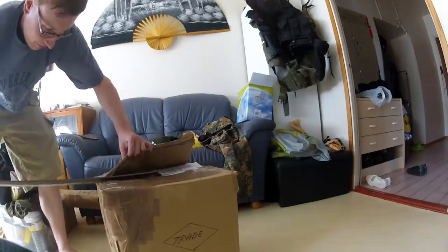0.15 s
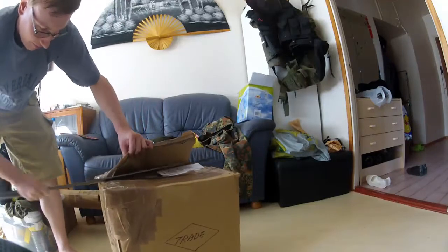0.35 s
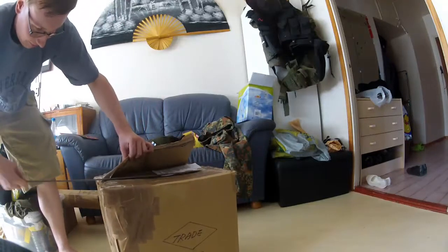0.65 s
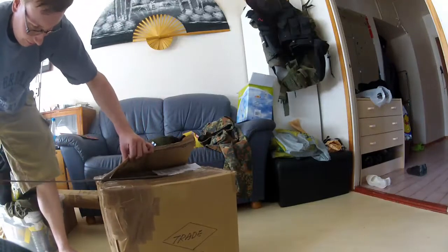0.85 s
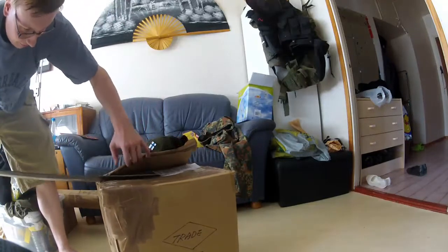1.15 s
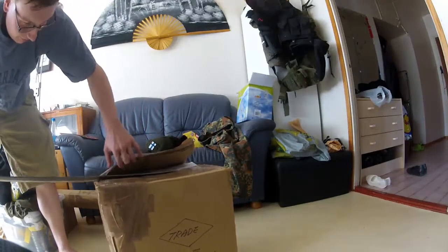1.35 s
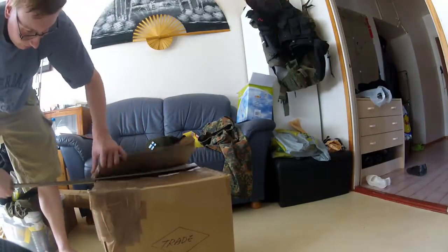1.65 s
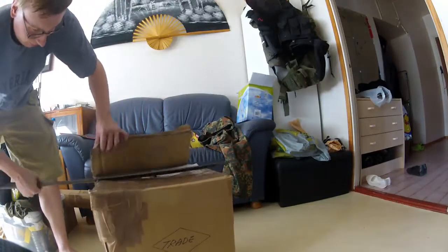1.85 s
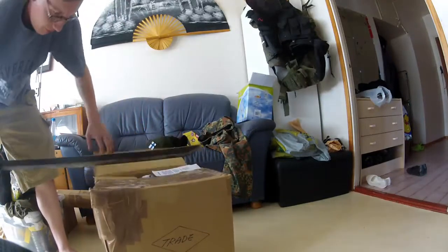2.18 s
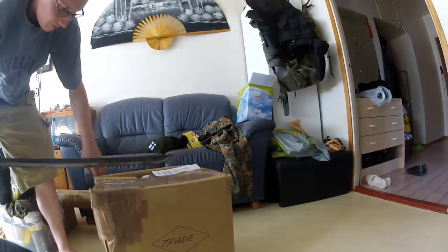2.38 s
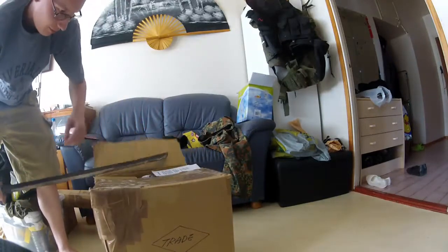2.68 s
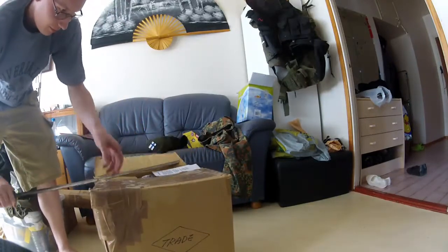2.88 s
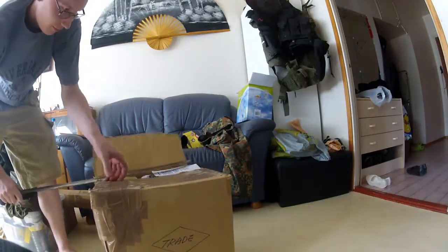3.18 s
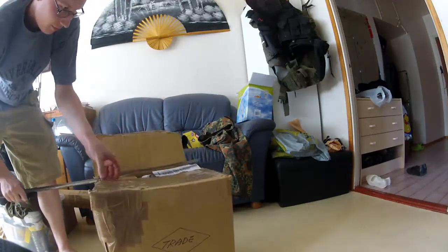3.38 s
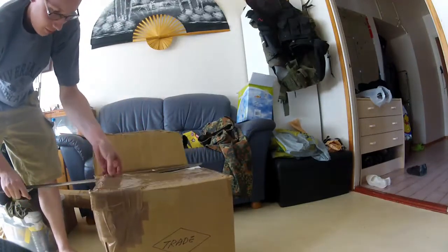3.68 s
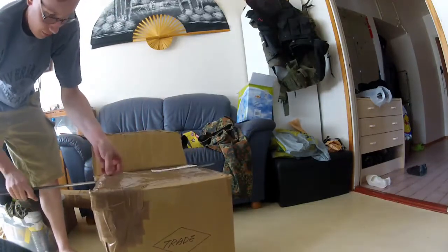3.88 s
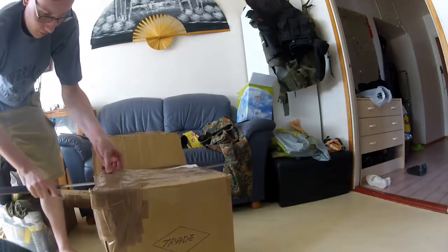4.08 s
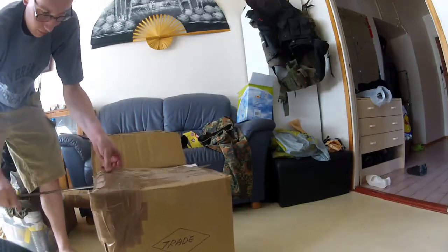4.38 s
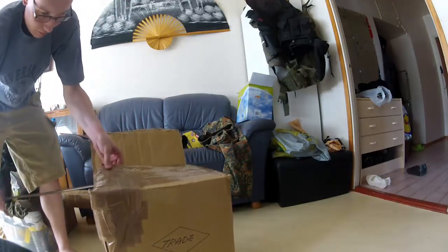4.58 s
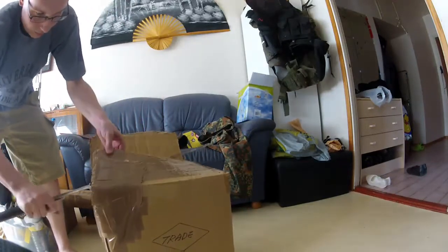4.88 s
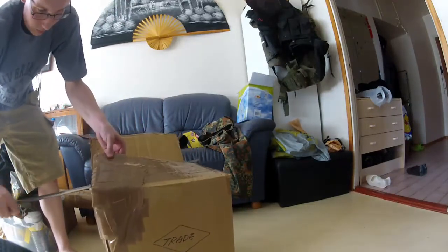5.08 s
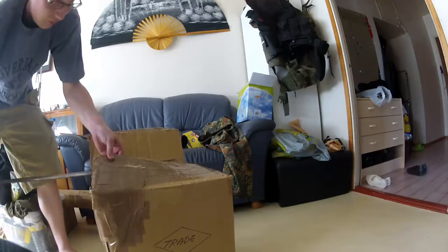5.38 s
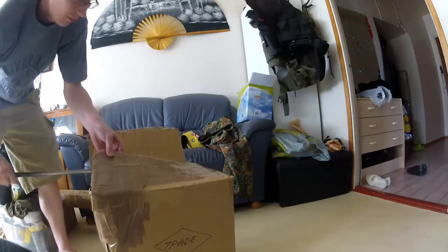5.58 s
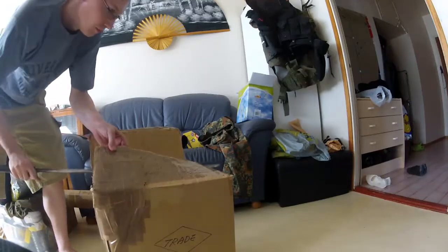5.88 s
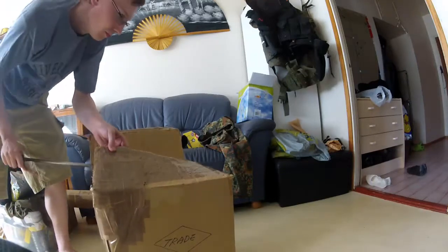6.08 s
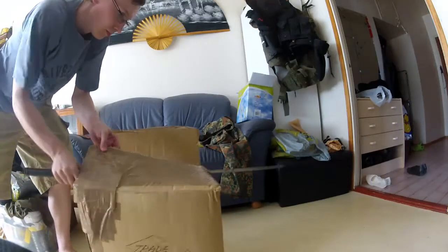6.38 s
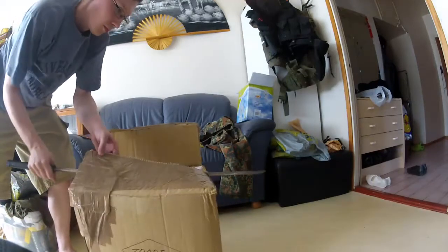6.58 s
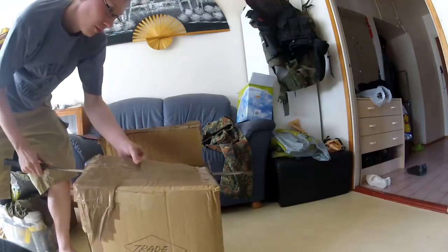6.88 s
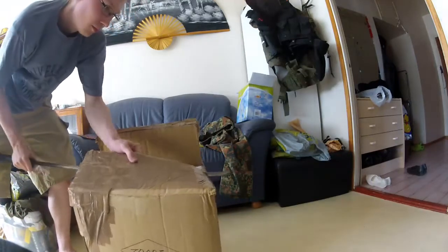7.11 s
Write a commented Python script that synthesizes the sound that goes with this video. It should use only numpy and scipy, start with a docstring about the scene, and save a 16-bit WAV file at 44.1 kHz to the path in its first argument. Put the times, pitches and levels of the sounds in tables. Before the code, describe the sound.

A small, lightly reverberant living room, heard from a metre or two through a camera microphone with a coloured, boxy tone. Faint low fan noise and wavering hum sit underneath. From 0 to 1.9 s a blade scrapes cardboard in short, crackly strokes, strongest in the first half second, with low box rumble and frequent soft, hollow flap knocks; thin metallic hisses sing near 0.8 to 1.25 s. It calms around 2 s, with a faint blade tone at 2.4 to 2.6 s and a deep thump at 2.66 s. Light rubs and knocks continue to 3.9 s. Tape bursts loudly at 4.1, 4.35 and 4.8 s, the last heaviest and booming, with rasping sawing between and just after. From 5.2 s it is nearly quiet except a sharp hollow knock at 5.5 s. Scraping returns around 6 s, with a solid thump at 6.36 s and a dry tick at 6.55 s, then weak rubs to about 7.1 s.

```python
"""A long blade saws and scrapes along the seam of a taped cardboard box, and three times the tape bursts loudly.
Place: a small living room; distance: a metre or two; microphone: in a camera whose housing colours the sound.
Rubbing is a train of random catches shaped by strokes; bursts and small ticks are showers of breaking fibres.
Flaps knock on the hollow box as struck panels, and narrow noise bands make the blade sing.
Fan noise and wavering sine tones lie faintly underneath."""
import sys
import numpy as np
from scipy import signal
from scipy.fft import rfft, irfft
from scipy.io import wavfile
from scipy.ndimage import uniform_filter1d

SR = 44100
rng = np.random.default_rng(int(sys.argv[2]) if len(sys.argv) > 2 else 0)


def bounce(signal):
    """Save signal as a 16-bit WAV file at the path given by the first command-line argument."""
    frames = np.transpose(np.atleast_2d(signal))
    limited = np.clip(frames, -1, 1)
    pcm = np.round(limited * 32767).astype(np.int16)
    wavfile.write(sys.argv[1], SR, pcm)


N = 319725
TIME = np.arange(N) / SR
RING = TIME[:SR // 2]  # time axis of every impulse response, half a second


def undb(db):
    """Decibels to gain."""
    return 10 ** (np.asarray(db) / 20)


def level(x, db, span=slice(None)):
    """Scale so that the span has this rms level."""
    return x * undb(db) / np.sqrt(np.mean(x[span] ** 2))


def cut(x, hz, kind, order=4):
    """Causal low-pass or high-pass."""
    return signal.sosfilt(signal.butter(order, min(hz, SR / 2 - 1), kind, fs=SR, output="sos"), x)


def through(x, response):
    """Pass a sound through an impulse response."""
    return signal.fftconvolve(x, response)[:len(x)]


def colour(points, size=4096):
    """Causal impulse response with this spectrum, from the folded cepstrum."""
    hz, db = np.transpose(points)
    grid = np.maximum(np.arange(size // 2 + 1) * SR / size, 1)
    spectrum_db = np.interp(np.log(grid), np.log(hz), db)
    cepstrum = irfft(np.log(undb(spectrum_db)))
    cepstrum[1:size // 2] *= 2
    cepstrum[size // 2 + 1:] = 0
    return irfft(np.exp(rfft(cepstrum)))


def resonate(x, table, size=16384):
    """Raise or lower narrow bands given as (centre [Hz], width [Hz], level [dB])."""
    hz = np.arange(size // 2 + 1) * SR / size
    total_db = sum(db / (1 + (2 * (hz - centre) / width) ** 2) for centre, width, db in table)
    return through(x, colour(np.column_stack([hz + 1, total_db]), size=size))


def walk(rate):
    """Slow chance with a spread near 1, drawn anew at this rate in Hz and smoothed."""
    k = int(SR / rate)
    steps = np.repeat(rng.standard_normal(N // k + 1), k)
    return level(uniform_filter1d(steps, k), 0)[:N]


def ring(hz, decay_s):
    """A damped swing."""
    return np.sin(2 * np.pi * hz * RING) * np.exp(-RING / decay_s)


def add(out, s, parts):
    """Mix in (sound, dB) parts at time s, each levelled over its first 50 ms."""
    start = int(s * SR)
    sound = sum(level(part, db, slice(SR // 20)) for part, db in parts)[:N - start]
    out[start:start + len(sound)] += sound


# early reflections from floor, wall and ceiling: (delay before scatter [s], relative gain)
REFLECTIONS = [(.0032, 0.14), (0.0093, 0.36), (0.0138, 0.43), (0.0184, 0.25)]
ROOM_T60_LOW_S, ROOM_T60_HIGH_S = 0.29, 0.33


def room(tail_db, echo_db=0, build_s=0.0028, scatter_s=0.0011, shift_s=.0005):
    """Direct sound, early reflections and a diffuse tail; both differ from place to place."""
    noise = rng.standard_normal(len(RING))
    low_fade = np.exp(-np.log(1000) * RING / ROOM_T60_LOW_S)
    high_fade = np.exp(-np.log(1000) * RING / ROOM_T60_HIGH_S)
    tail = cut(noise, 2360, "low", order=1) * low_fade + cut(noise, 1940, "high", order=1) * high_fade
    tail *= 1 - np.exp(-RING / build_s)
    response = tail * undb(tail_db) / np.linalg.norm(tail)
    response[0] += 1
    for s, gain in REFLECTIONS:
        # furniture smears each reflection over a millisecond or so
        smear = rng.standard_normal(len(RING)) * np.exp(-RING / scatter_s)
        smear *= gain * undb(echo_db) / np.linalg.norm(smear)
        delay_s = s + shift_s * rng.uniform(-1, 1)
        response += np.roll(smear, int(delay_s * SR))
    return response


# colour of the steady fan noise: (frequency [Hz], relative level [dB])
FAN_COLOUR = [(20, -16), (45, -9), (70, -16), (150, -7), (230, -6), (370, 3), (480, -15), (680, -22),
              (1300, -35), (2800, -38.5), (6000, -51.5), (12000, -40.5), (15900, -65.5)]
# appliance hum: (frequency [Hz], amplitude before waver [dB])
HUM_TONES = [(100, -61), (210, -54), (301, -54), (344.5, -49.5), (490, -61)]


def background(air_db=-44.5, waver_db=2.5, drift_rad=.7):
    """Steady fan noise and a hum of sines that waver slightly in level and phase."""
    air = level(through(rng.standard_normal(N), colour(FAN_COLOUR)), air_db)
    hum = 0
    for hz, db in HUM_TONES:
        amplitude = undb(db + waver_db * walk(6))
        hum = hum + amplitude * np.sin(2 * np.pi * hz * TIME + drift_rad * walk(9.5))
    return air + hum


# colour of the hollow box: (frequency [Hz], relative level [dB])
BOX_COLOUR = [(15, -32), (25, -4), (124, -1.5), (202, 3), (318, -0.5), (461, -4.5), (518, -3), (679, -6),
              (776, -15), (859, -22), (1000, -19.5), (1090, -32.5), (1240, -33.5), (1400, -35), (1820, -89),
              (3080, -120)]


def flex(place, hz, thud_db, boom_db, panel_db, ring_s, ring_share, thud_hz=48, thud_s=0.043):
    """A struck panel swings for a few cycles at its own pitch while the whole box thuds on the floor."""
    wall = level(through(place, colour(BOX_COLOUR)), 0)
    swing = level(cut(through(place, ring(hz, ring_s)), 760, "low"), 0)
    body = wall + ring_share * swing
    thud = level(ring(thud_hz, thud_s), 0) + 2.2 * level(cut(wall, 124, "low"), 0)
    boom = cut(cut(body, 170.0, "high", order=6), 210, "low")
    return [(thud, thud_db), (boom, boom_db), (cut(body, 207, "high"), panel_db)]


def fracture(place, surface, snap_s, crumble_s, crumble_db):
    """A break runs through the fibres in a moment, then a thinning shower of smaller ones follows."""
    run, shower = rng.standard_normal((2, len(RING)))
    run = run * RING * np.exp(-RING / snap_s)
    shower = shower ** 5 * np.exp(-RING / crumble_s)  # the fifth power leaves sparse spikes
    breaks = level(run, 0) + level(shower, crumble_db)
    return through(through(breaks, colour(surface)), place)


def landing(settle_s):
    """Contact force of a flap that touches down bit by bit."""
    return rng.standard_normal(len(RING)) * RING * np.exp(-RING / settle_s)


# flaps and hand knocking on the box, levels before the trims in knocks():
# (time [s], panel pitch [Hz], panel level [dB], boom level [dB], papery slap level [dB], contact settling [s])
FLAP_KNOCKS = [(0.085, 184, -38.5, -32, -56, .004), (0.298, 285, -35.5, -36.5, -58, 0.0045),
               (0.521, 335, -32, -30.5, -50.5, 0.0004), (0.608, 300, -46, -42.5, -58, 0.0036),
               (0.672, 194, -51, -41, -73, 0.0035), (0.734, 186, -39, -37.5, -53, 0.0041),
               (1.04, 380, -37, -37, -47.5, 0.00017), (1.256, 217, -37, -38.5, -55, 0.0061),
               (1.364, 348, -42, -51, -60, .005), (1.462, 181, -41.5, -40.5, -59, .0003),
               (1.522, 353, -35.5, -47, -53, .0003), (1.637, 267, -37.5, -34, -53, 0.0028),
               (1.673, 324, -34, -48, -38, 0.00076), (1.686, 302, -31.5, -34.5, -60, 0.007),
               (2.280, 230, -61, -42.5, -60, 0.0021), (2.660, 215, -28.5, -25, -48.5, 0.00035),
               (2.841, 177, -35.5, -30, -55, 0.00026), (3.281, 390, -33.5, -47, -71, .0003),
               (3.352, 323, -40, -42, -66, 0.0035), (3.932, 249, -32, -33.5, -43, 0.00026),
               (5.521, 444, -23, -31.5, -47, 0.00022), (5.879, 158.5, -41.5, -32.5, -57.5, 0.0008),
               (6.19, 265, -38, -35, -51, 0.0089), (6.360, 290, -30, -27, -52, 0.0044),
               (7.117, 337, -45.5, -53, -60, 0.0044)]
# colour of a papery slap: (frequency [Hz], relative level [dB])
SLAP_COLOUR = [(530, -43), (900, 7.5), (1060, -12.5), (1220, 4), (1540, -7), (2380, -5), (2880, -5.5),
               (4090, -4), (6070, -22.5), (7810, -16.5), (10600, -25), (11800, -15), (12800, -25.5),
               (13400, -30), (15900, -29)]
# loose parts that buzz along with a knock: (frequency [Hz], decay [s], relative level [dB])
LOOSE_PARTS = [(8400, 0.00033, 1), (12200, 0.00088, 7), (12300, .0007, -11)]
# a wider, lower panel shakes the floor more: the thud is set from the listed boom and the panel pitch
THUD_UNDER_LISTED_BOOM_DB, THUD_FALL_DB_PER_OCTAVE, MIDDLE_PANEL_HZ = 5.5, 7, 270


def knocks(crack_db=-2.0, treble_db=-6.5, buzz_db=-27, body_db=2.5, clean_s=.001):
    """Soft cardboard blows: mostly hollow body, with a little papery slap and a faint high buzz."""
    out = np.zeros(N)
    for s, hz, panel, boom, slap_db, settle_s in FLAP_KNOCKS:
        octaves = np.log2(hz / MIDDLE_PANEL_HZ)
        thud = boom - THUD_UNDER_LISTED_BOOM_DB - THUD_FALL_DB_PER_OCTAVE * octaves
        place = room(tail_db=1.0, echo_db=1.0)
        # a quick contact acts as one clean push
        if settle_s > clean_s:
            place = through(place, landing(settle_s))
        slap = fracture(room(tail_db=4.5), SLAP_COLOUR, snap_s=0.0011 + settle_s, crumble_s=0.011, crumble_db=1)
        add(out, s, flex(place, hz, thud, boom + body_db, panel + body_db, ring_s=0.0022, ring_share=0.61))
        slap_low, slap_high = cut(slap, 2960, "low"), cut(slap, 4800, "high")
        add(out, s, [(slap_low, slap_db + crack_db), (slap_high, slap_db + treble_db)])
    loose = sum(undb(db) * ring(hz, decay_s) for hz, decay_s, db in LOOSE_PARTS)
    rattle = out * rng.standard_normal(N)
    return out + undb(buzz_db) * through(rattle, loose / np.linalg.norm(loose))


# single fibres and flutes giving way: (time [s], snap level [dB], level of the panel under them [dB])
FIBRE_TICKS = [(2.14, -57.5, -46), (3.81, -59, -44.5), (4.611, -50, -41), (6.547, -45, -41.5)]
# colour of the blade on cardboard fibres: (frequency [Hz], relative level [dB])
RASP_COLOUR = [(410, -24), (700, -7), (1020, -15.5), (2020, -12), (2420, -14), (2910, -6.5), (3490, -14),
               (4030, -11), (6040, -23.5), (7840, -17), (10600, -26.5), (12700, -22.5), (13400, -31),
               (14700, -22.5), (15900, -35.5)]


def ticks():
    """Small dry snaps along the cut, each a brief fracture that also excites the panel."""
    out = np.zeros(N)
    for s, snap_db, panel_db in FIBRE_TICKS:
        place = room(tail_db=4.5)
        snap = fracture(place, RASP_COLOUR, snap_s=.0006, crumble_s=0.0077, crumble_db=-8)
        panel = cut(through(place, colour(BOX_COLOUR)), 220, "high")
        add(out, s, [(snap, snap_db), (panel, panel_db)])
    return out


# the sliding blade sings in narrow bands, levels before swell and flutter:
# (start [s], end [s], pitch [Hz], width [Hz], level [dB])
BLADE_SINGING = [(.78, .89, 4150, 400, -54), (.79, .88, 7950, 400, -59), (.97, 1.07, 5000, 1200, -55),
                 (1.09, 1.25, 4800, 1600, -55), (1.11, 1.24, 7000, 2000, -58), (2.35, 2.64, 870, 200, -54),
                 (2.42, 2.67, 1985, 210, -61), (2.47, 2.61, 3000, 220, -66)]


def singing(flutter_db=3.5):
    """Friction drives a resonance of the steel blade for the length of a stroke."""
    out = 0
    for start, end, hz, width, db in BLADE_SINGING:
        swell = np.sin(np.pi * np.clip((TIME - start) / (end - start), 0, 1))
        mode = ring(hz, 1 / (np.pi * width))
        tone = level(through(through(rng.standard_normal(N), mode), mode), db)
        out = out + tone * swell * undb(flutter_db * walk(40))
    place = room(tail_db=2)
    return through(out, place / np.linalg.norm(place))


# tape bursting under the blade, levels before the trims in bursts(): (time [s], panel pitch [Hz],
# thud level [dB], boom level [dB], panel level [dB], crack level [dB], treble level [dB], tape pitch [Hz])
TAPE_BURSTS = [(4.085, 351, -32.5, -26, -14.5, -28.5, -29.5, 2890),
               (4.353, 380, -38, -26.5, -16, -31, -27.5, 2920),
               (4.816, 208, -42, -9, -12.5, -19.5, -23, 1810)]
# colour of tearing tape: (frequency [Hz], relative level [dB])
TEAR_COLOUR = [(470, -14), (800, -6), (1030, -10), (1510, -7), (1740, 0), (2500, -7), (2940, -1.5),
               (3370, -10.5), (4780, -15.5), (5990, -22.5), (6700, -20), (9040, -18), (11000, -21.5),
               (15300, -19), (15900, -50)]


def bursts(tape_s=0.0009, tape_share=0.61, body_db=1.0, crack_db=1.0, count=3, wall_ring_s=.005, wall_share=.7):
    """Taut tape lets go at several spots at once: it twangs briefly and the wall of the box springs back."""
    out = np.zeros(N)
    for s, hz, thud, boom, panel, crack, treble, tape_hz in TAPE_BURSTS:
        snap = 0
        for _ in range(count):
            snap = snap + fracture(room(tail_db=3.5), TEAR_COLOUR, snap_s=0.00074, crumble_s=0.0059, crumble_db=-3.5)
        twang = level(snap, 0) + tape_share * level(through(snap, ring(tape_hz, tape_s)), 0)
        place = room(tail_db=0.0, echo_db=-13.5)
        add(out, s, flex(place, hz, thud, boom + body_db, panel + body_db, wall_ring_s, wall_share))
        crack_band, treble_band = cut(twang, 3300, "low", order=3), cut(snap, 3420, "high", order=3)
        add(out, s, [(crack_band, crack + crack_db), (treble_band, treble)])
    return out


# every stroke bites over the first part of its length, eases off as it runs, and dies away
BITE_SHARE, EASE_DB_PER_S, RELEASE_S = 0.36, 15.5, 0.058


def pressure(start, length):
    """Force of one stroke: it bites, eases off while it runs, then lets go."""
    age = TIME - start
    bite = np.clip(age / (BITE_SHARE * length), 0, 1)
    ease = undb(-EASE_DB_PER_S * np.clip(age, 0, length))
    return bite * ease * np.exp(-np.maximum(age - length, 0) / RELEASE_S)


# strokes of the blade and slides of the flaps, levels before easing and the trims in rubbing():
# (start [s], length [s], rasp level [dB], level of the box rumbling with it [dB])
BLADE_STROKES = [(-.03, 0.05, -43.5, -38), (0.035, 0.088, -38.5, -34), (0.212, 0.16, -38.5, -34.5),
                 (.36, 0.072, -44.5, -37), (0.466, 0.15, -49, -38), (0.638, .06, -53.5, -45),
                 (0.706, .13, -47, -38), (0.852, 0.29, -48.5, -39.5), (1.17, 0.13, -45.5, -36),
                 (1.347, 0.075, -45, -40.5), (1.452, 0.21, -47.5, -36), (1.655, 0.15, -44, -35.5),
                 (1.896, .11, -50, -43.5), (2.117, 0.23, -57.5, -47.5), (2.334, 0.1, -52, -38.5),
                 (2.5, .1, -59.5, -44), (2.815, 0.12, -54.5, -40), (3.246, 0.032, -52.5, -43),
                 (3.327, .17, -52, -41.5), (3.617, 0.063, -50.5, -43), (3.79, .04, -58.5, -50),
                 (3.863, 0.23, -44.5, -41), (4.169, 0.35, -39.5, -32), (4.498, 0.23, -44, -38.5),
                 (4.754, 0.11, -36, -21.5), (4.842, 0.24, -43.5, -32.5), (5.107, 0.1, -48.5, -35),
                 (5.95, 0.11, -56, -39), (6.19, 0.11, -48.5, -34), (6.282, 0.1, -40.5, -32.5),
                 (6.41, 0.068, -46.5, -36.5), (6.508, .05, -44, -48), (6.57, 0.22, -52, -41),
                 (6.843, 0.069, -52.5, -41), (6.965, 0.076, -56, -42.5), (7.092, 0.071, -54.5, -43)]
# between strokes the blade and hand rest lightly on the box (before the same trims)
REST_RASP_DB, REST_RUMBLE_DB = -63, -45.5


def contact():
    """Strength of the rasp and of the rumble: the firmest stroke of the moment, or the resting touch."""
    rasp, rumble = undb(REST_RASP_DB), undb(REST_RUMBLE_DB)
    for start, length, rasp_db, rumble_db in BLADE_STROKES:
        force = pressure(start, length)
        rasp = np.maximum(rasp, force * undb(rasp_db))
        rumble = np.maximum(rumble, force * undb(rumble_db))
    return rasp, rumble


def rubbing(catches_per_s=1800, spread_db=3.0, jerk_db=2.5, wander_db=2.0, rasp_db=0.5, rumble_db=-0.5, count=5):
    """The blade catches on fibres and flutes in uneven jerks; each catch ticks and nudges the box."""
    rasp, rumble = contact()
    fibres, box = (h / np.linalg.norm(h) for h in (colour(RASP_COLOUR), colour(BOX_COLOUR)))
    out = 0
    # several contact spots share the catches, each with its own path through the room
    for _ in range(count):
        nudges = rng.standard_normal(N) * (rng.random(N) < catches_per_s / count / SR)
        scatter_db = spread_db * np.minimum(rng.exponential(size=N), 4)
        catches = nudges * undb(scatter_db + jerk_db * walk(35) + wander_db * walk(6))
        scrape = through(level(catches, rasp_db) * rasp, fibres)
        box_rumble = through(level(nudges, rumble_db) * rumble, box)
        place = room(tail_db=3.5)
        out = out + through(scrape + box_rumble, place / np.linalg.norm(place))
    return out / np.sqrt(count)


# standing waves of the room and the hollow box: (centre [Hz], width [Hz], level [dB])
STANDING_WAVES = [(46.8, 4.3, 3.5), (96, 6.7, 3), (166.3, 17, -4.5), (177.5, 15, 1), (308, 15, 1),
                  (385, 16, 0.5), (429, 5.3, 4.5), (485, 16, 1), (620, 20, 4), (780, 18, 3),
                  (963, 135, -2.5)]


def scene():
    """Bursts, knocks, ticks and rubbing share the standing waves; singing and background join them."""
    box = resonate(bursts() + knocks() + ticks() + rubbing(), STANDING_WAVES)
    return (box + singing() + background())[None]


# resonances and notches of the camera housing around the microphone: (centre [Hz], width [Hz], level [dB])
HOUSING_BANDS = [(2090, 310, 3.5), (2987, 49, 0), (5180, 810, 0.5), (5980, 404, -5.5), (9130, 370, 5.5),
                 (10760, 260, -10), (11250, 700, 4.5), (12400, 500, 3), (13140, 720, -9.5)]


def record(dry, bass_cut_hz=27, top_hz=15700):
    """The housing colours the sound, deep bass drops away, peaks past full scale clip, and the top is cut."""
    heard = cut(resonate(dry[0], HOUSING_BANDS), bass_cut_hz, "high", order=2)
    overloaded = np.clip(heard, -1, 1)
    return signal.sosfilt(signal.ellip(10, .2, 80, top_hz, fs=SR, output="sos"), overloaded)[None]


dry = scene()
out = record(dry)
bounce(out)
```